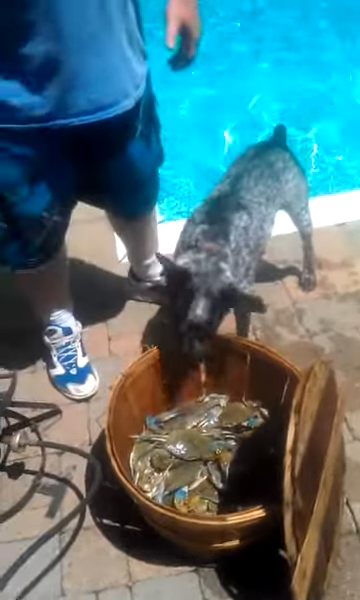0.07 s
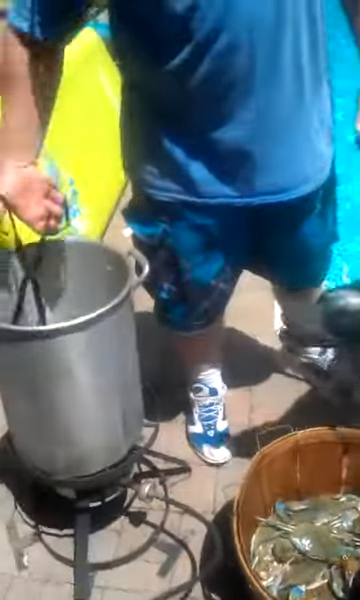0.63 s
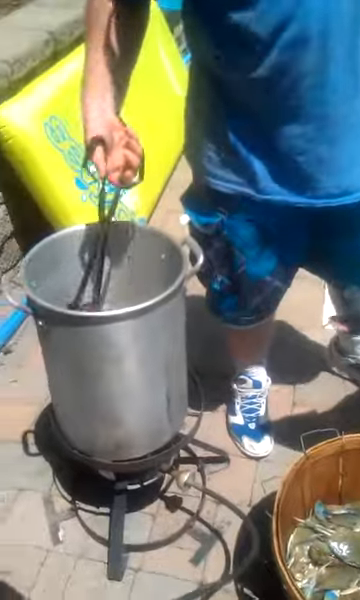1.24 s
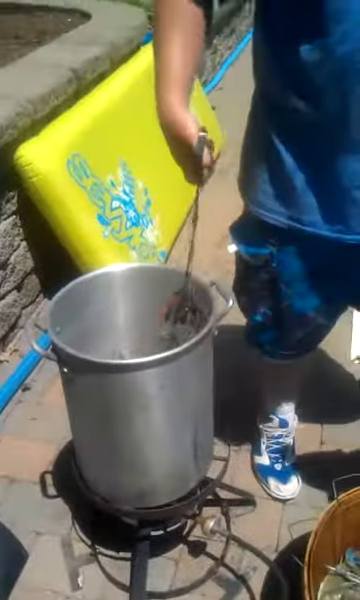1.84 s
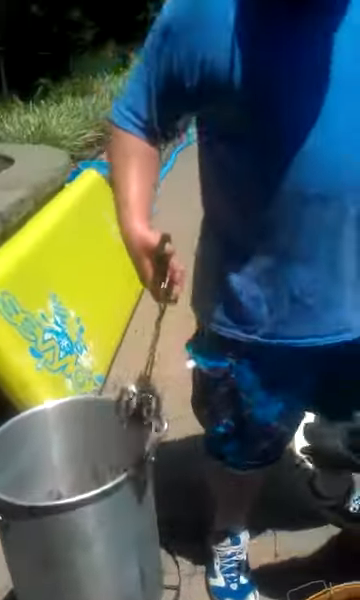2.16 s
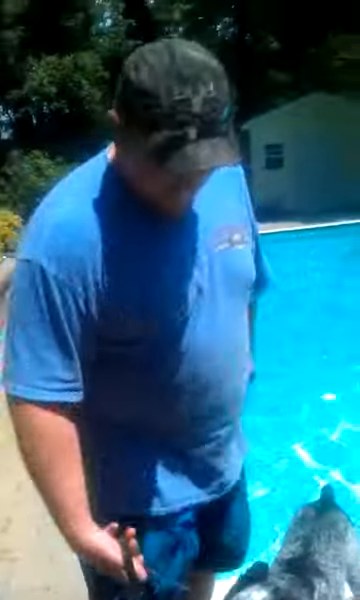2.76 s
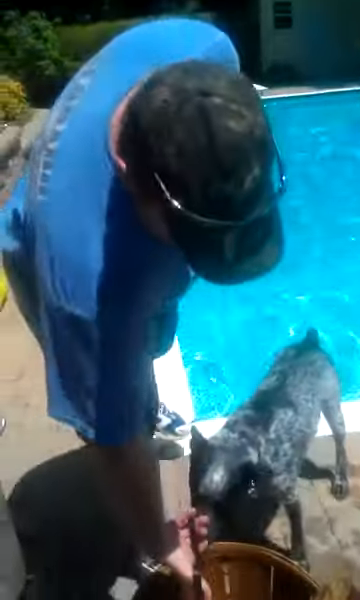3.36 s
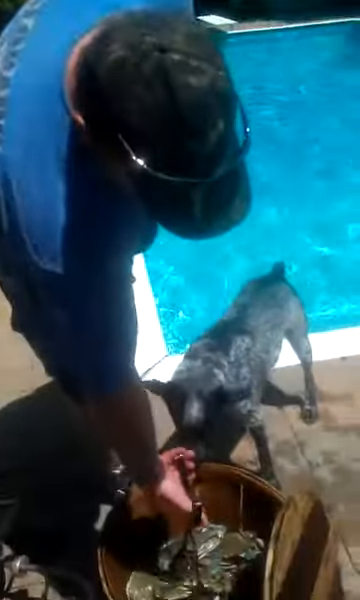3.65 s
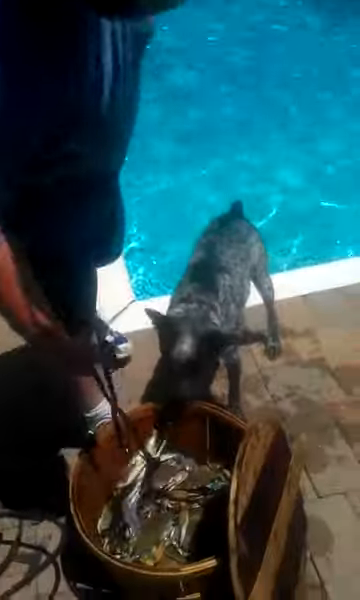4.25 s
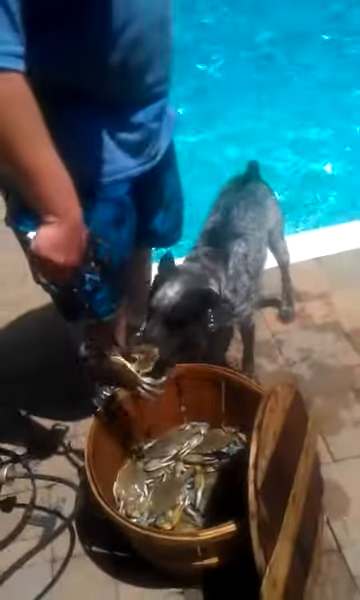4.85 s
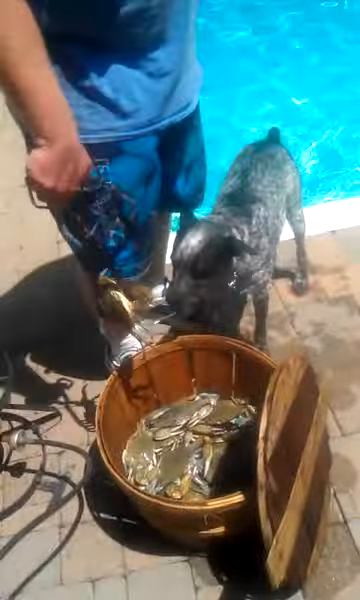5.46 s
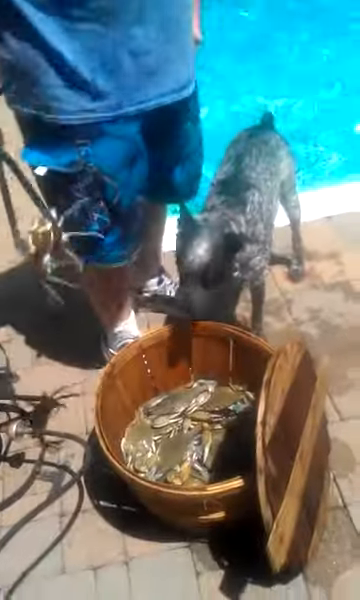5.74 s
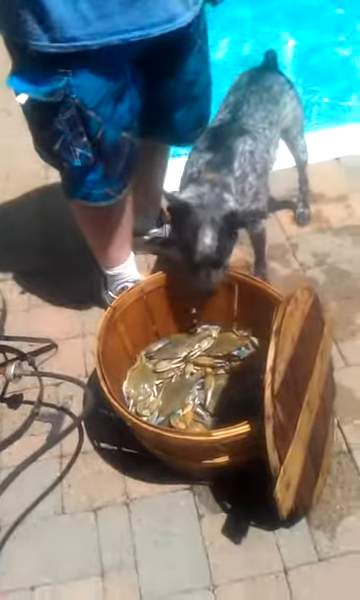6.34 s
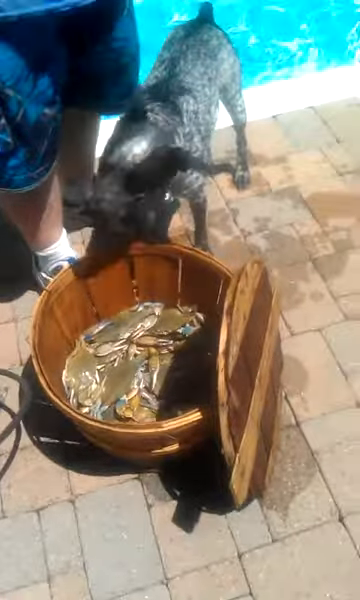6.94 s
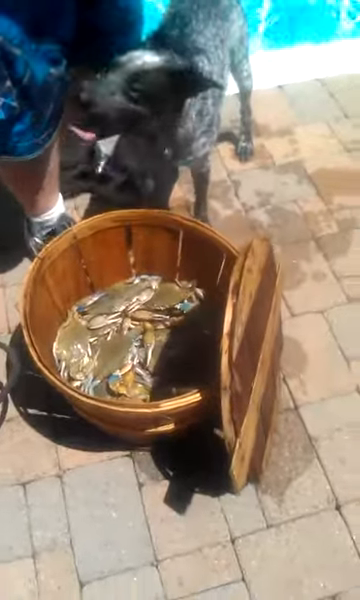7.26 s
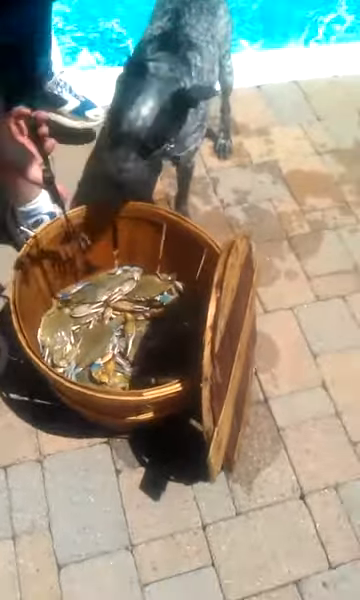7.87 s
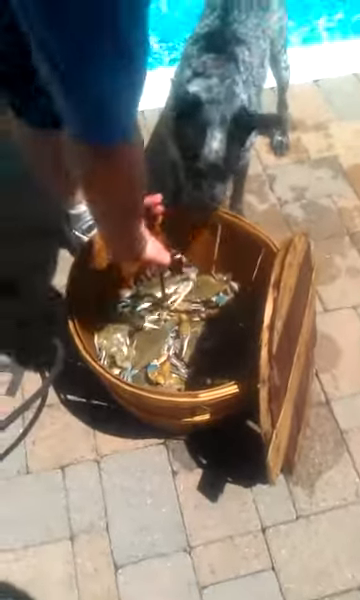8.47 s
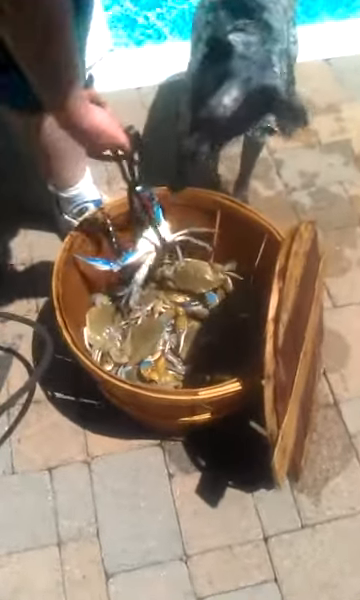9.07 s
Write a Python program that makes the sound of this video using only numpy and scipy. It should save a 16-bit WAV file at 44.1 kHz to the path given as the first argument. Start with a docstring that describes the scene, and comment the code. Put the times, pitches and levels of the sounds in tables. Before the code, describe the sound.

Steel tongs clack and knock around a wooden basket of live crabs, whose shells click and scrape over a soft outdoor rush.

```python
"""Live crabs are picked from a wooden basket with long steel tongs, over a patio's soft rush and pump hum. The
tongs clack shut and knock on pot and slats, their arms ringing; feet scuff between the flurries. Shells and
claws click and scrape together, then settle while a dog sniffs at the basket. Near 6.7 s steel squeaks on a
shell and the jaws snap shut. The heap rattles up again, ending in hard clacks. The patio gives every knock a
short slap back."""
import sys
import numpy as np
from scipy import signal
from scipy.fft import rfft, irfft, next_fast_len
from scipy.io import wavfile
from scipy.ndimage import uniform_filter1d, map_coordinates

SR = 44100
rng = np.random.default_rng(int(sys.argv[2]) if len(sys.argv) > 2 else 0)


def to_wav(s):
    """Save 16-bit WAV."""
    ch = np.atleast_2d(s).T  # columns
    pcm = np.round(np.clip(ch, -1, 1) * 32767)  # PCM
    wavfile.write(sys.argv[1], SR, pcm.astype(np.int16))


N = 406161

# Modes of the steel tongs. Each row: pitch in Hz, relative level in dB, t60 in seconds.
TONG_MODES = [(2548, 11, 0.051), (2683, 19.5, 0.018), (2976, 12, 0.051), (3630, -33, 0.2),
              (3970, -10, 0.065), (4800, -22, 0.019), (5360, 18, 0.027), (5660, 20, 0.03),
              (6090, 22, 0.024), (7130, 13, 0.024), (10100, 15, 0.036), (10800, -16, .05)]
# How busy the heap of crabs is. Each row: time in seconds, level in dB.
HEAP_ACTIVITY = [(0, -49.5), (.6, -59.5), (1.1, -58.5), (1.36, -53.5), (1.5, -60), (1.95, -51.5),
                 (2.5, -51.5), (3, -52.5), (4.3, -57.5), (5, -56.5), (5.6, -61.5), (6.5, -60), (7.1, -57.5),
                 (7.5, -60.5), (8.05, -58), (8.35, -52), (8.6, -60), (9.2, -50)]


def amp(db):
    """Decibels to gain."""
    return 10 ** (np.asarray(db) / 20)


def unit(x):
    """Scale to rms 1."""
    return x / np.sqrt(np.mean(x ** 2) + 1e-20)


def unit_attack(x):
    """Scale to rms 1 over the first 8 ms."""
    return x / np.sqrt(np.mean(x[:round(.008 * SR)] ** 2) + 1e-20)


def along(points, hz):
    """Read a curve of (Hz, value) points on a log frequency axis."""
    freqs, values = np.transpose(points)
    return np.interp(np.log(hz + 1), np.log(freqs + 1), values)


def wobble(rate):
    """A smooth random curve, rate knots a second."""
    return map_coordinates(rng.standard_normal(int(N * rate / SR) + 4), [np.arange(N) * rate / SR])


def swell(peak, rise, fall):
    """A bell-shaped envelope; all times in seconds."""
    t = np.arange(N) / SR - peak
    return np.exp(-(t / np.where(t < 0, rise, fall)) ** 2)


def grains(size, rate, spread_db):
    """Tiny slips at random moments, about rate a second, a few far stronger than the rest."""
    chance = rng.random(size)
    strength = np.minimum(rng.exponential(size=size), 4)
    return (chance < rate / SR) * amp(spread_db * strength) * np.sign(rng.standard_normal(size))


def filtered(x, response):
    """Shape x by a gain given as a function of Hz."""
    size = next_fast_len(len(x) + 4096)
    return irfft(rfft(x, size) * response(np.fft.rfftfreq(size, 1 / SR)), size)[:len(x)]


def coloured_noise(colour):
    """Noise at rms 1 whose spectrum follows (Hz, dB) points."""
    return unit(filtered(rng.standard_normal(N), lambda f: amp(along(colour, f))))


def band(x, low_hz, high_hz, order=3):
    """Causal band-pass."""
    return signal.sosfilt(signal.butter(order, [low_hz, high_hz], "band", fs=SR, output="sos"), x)


def resonance(f, hz, width):
    """Response at f of one resonance centred on hz."""
    return 1j * f * width / (hz * hz - f * f + 1j * f * width)


def resonant(x, peaks):
    """Play x through (Hz, width in Hz, dB) resonances of alternating polarity."""
    return filtered(x, lambda f: sum((-1) ** k * amp(db) * resonance(f, hz, width)
                                     for k, (hz, width, db) in enumerate(peaks)))


def add(track, start, sound):
    """Mix a sound in at start seconds."""
    part = track[max(round(start * SR), 0):][:len(sound)]
    part += sound[:len(part)]


def outdoors(drift_db=0.3, patchy_db=2.5, hum_hz=123.6, hum_db=-71):
    """A soft, patchy rush of air and pool water, with the low hum of a pump."""
    # Colour of the rush. Each row: frequency in Hz, relative level in dB.
    air_colour = [(20, -20), (60, -9.5), (95, -7), (130, 1), (260, -1), (420, -4), (900, -0.5),
                  (1550, -6.5), (2200, -1.5), (3100, -6.5), (3900, -12), (7000, -11), (9000, -18),
                  (13500, -18.5), (16000, -36)]
    # Peaks in that colour. Each row: centre in Hz, width in Hz, lift in dB.
    air_peaks = [(291, 11.6, 8.5), (814, 43, 4.5), (2240, 250, 4), (2770, 116, 5), (3414, 52, 11)]
    # Fader of the rush. Each row: time in seconds, level in dB.
    rush_levels = [(0, -52), (3, -51.5), (4.4, -53), (5.7, -53.5), (7.2, -52.5), (9.2, -53.5)]

    def colour(f):
        lift = sum(db / (1 + ((f - hz) / (width / 2)) ** 2) for hz, width, db in air_peaks)
        return amp(along(air_colour, f) + lift)

    t = np.arange(N) / SR
    spectra = signal.stft(rng.standard_normal(N), nperseg=512)[2]
    patches = uniform_filter1d(rng.standard_normal(spectra.shape), size=4, axis=0)
    patches = uniform_filter1d(patches, size=12, axis=1)
    lapping = signal.istft(spectra * amp(patchy_db * unit(patches)), nperseg=512)[1][:N]
    rush_db = np.interp(t, *np.transpose(rush_levels)) + drift_db * wobble(18)
    hum = amp(hum_db + 3.3 * wobble(3.1)) * unit(np.sin(2 * np.pi * hum_hz * t + .5 * wobble(3.1)))
    return amp(rush_db) * unit(filtered(lapping, colour)) + hum


def patio(x, tail_db=-15, slap_db=-19, slap_delay=0.018, slap_t60=0.027):
    """Adds a scattered slap from the low wall and a thin open-air tail."""
    # Decay of the tail. Each row: frequency in Hz, t60 in seconds.
    decay_times = [(200, 0.35), (1000, 0.24), (4000, 0.11), (12000, 0.036)]
    hz, t, spectra = signal.stft(rng.standard_normal(SR // 3), SR, nperseg=256)
    tail = signal.istft(spectra * amp(-60 * t / along(decay_times, hz)[:, None]), SR, nperseg=256)[1]
    late = np.arange(len(tail)) / SR - slap_delay
    slap = rng.standard_normal(len(tail)) * (late > 0) * amp(-60 * np.abs(late) / slap_t60)
    echo = amp(tail_db) * tail / np.linalg.norm(tail) + amp(slap_db) * slap / np.linalg.norm(slap)
    return x + signal.fftconvolve(x, echo)[:N]


def foot_scuffs(flutter_db=2):
    """Soles and clothes brush as someone shifts their stance: a soft body with an airy top."""
    # Each row: peak, rise and fall in seconds, level in dB, top in dB against the body.
    scuffs = [(.86, 0.086, 0.087, -45.5, -14.5), (2.42, 0.072, 0.063, -45, -3.5)]
    # Colours of the two layers. Each row: frequency in Hz, relative level in dB.
    body_colour = [(150, -22), (400, -2.5), (900, -3), (1500, -3.5), (2500, 8), (3300, -5.5), (5000, -17),
                   (9000, -36)]
    top_colour = [(2500, -30), (4500, -5), (7000, 6.5), (8500, -3), (10500, 5.5), (12500, -5), (15500, -21)]
    body, top = coloured_noise(body_colour), coloured_noise(top_colour)
    brush = sum(amp(db) * swell(peak, rise, fall) * (body + amp(top_db) * top)
                for peak, rise, fall, db, top_db in scuffs)
    return brush * amp(flutter_db * wobble(39.5))


def dog_sniffs(flutter_db=1):
    """The dog sniffs at the basket: soft swells of air through the hollows of its nose."""
    # Each row: peak, rise and fall in seconds, level in dB.
    sniffs = [(3.54, 0.13, .06, -51.5), (4.915, 0.14, 0.12, -48.5), (6.385, 0.15, 0.087, -44)]
    # Colour of the nose. Each row: frequency in Hz, relative level in dB.
    nose_colour = [(150, -22), (450, -8.5), (800, -1.5), (1200, 2.5), (1600, -10.5), (2250, 3.5),
                   (2700, -7.5), (4000, -22), (8500, -30), (11000, -19.5), (15000, -40)]
    breath = coloured_noise(nose_colour) * amp(flutter_db * wobble(30))
    return breath * sum(amp(db) * swell(peak, rise, fall) for peak, rise, fall, db in sniffs)


def basket(x):
    """Resonances of the slats, the hollow between them and the heaped shells."""
    # Each row: centre in Hz, width in Hz, gain in dB.
    basket_modes = [(253, 106, 0.5), (602, 175, 0.5), (980, 490, 3), (1805, 170, 6.5), (2040, 143, 7.5),
                    (2490, 535, 4.5), (3270, 1130, -1.5), (5780, 2800, -7.5), (7650, 610, -6.5),
                    (10700, 3700, -15.5)]
    return resonant(x, basket_modes)


def carapace(x, lift_db, q=22, count=7):
    """Every shell adds a few narrow resonances of its own."""
    centres_hz = 1800 * 8 ** rng.random(count)
    return filtered(x, lambda f: 1 + amp(lift_db) * sum(resonance(f, hz, hz / q) for hz in centres_hz))


def stirring(unrest_db=3, width_hz=110):
    """Restless legs keep scratching in the heap and the loose tongs jiggle in their lowest modes."""
    slips = grains(N, rate=900, spread_db=2.8) * amp(unrest_db * wobble(16))
    jiggle = filtered(slips, lambda f: sum(amp(db) * resonance(f, hz, width_hz)
                                           for hz, db, _ in TONG_MODES[:4]))
    scratch = band(basket(slips), 700, 5000, order=1)
    level_db = np.interp(np.arange(N) / SR, *np.transpose(HEAP_ACTIVITY))
    return amp(level_db) * unit(unit(scratch) + unit(jiggle))


def wall_bumps(trim_db=-5, attack_s=0.00044, width=0.098, t60_cycles=55):
    """Heavier blows sound clusters of low modes in basket and pot; the lower, the longer they last."""
    # Each row: start in seconds, level in dB before the trim, pitch in Hz.
    bumps = [(.093, -36, 510), (.147, -45, 553), (.286, -40, 1160), (.862, -39, 450), (1.677, -41, 554),
             (1.707, -37, 530), (2.243, -55, 900), (3.529, -39, 350), (3.762, -32.5, 626), (4.08, -31, 850),
             (6.712, -40.5, 308), (6.713, -42, 420), (6.715, -30.5, 970), (6.733, -37, 560),
             (8.27, -31, 1090), (8.49, -31.5, 1050), (8.648, -48, 267), (8.697, -26.5, 1070),
             (8.742, -43.5, 414), (8.752, -43, 271), (8.75, -26, 645), (8.862, -25, 970), (9.092, -44, 269),
             (9.155, -20, 1170)]
    out, t = np.zeros(N), np.arange(SR // 4) / SR
    for start, db, hz in bumps:
        wall = band(rng.standard_normal(len(t)), hz / (1 + width), hz * (1 + width), order=2)
        fade = amp(-60 * t * hz / t60_cycles) * (1 - np.exp(-t / attack_s))
        add(out, start, amp(db + trim_db) * unit(wall * fade) * np.sqrt(np.mean(fade ** 2)))
    return out


def shell_scrapes(catch_db=2.5, bottom_db=-13, roundness=0.61):
    """Spiny shells catch and slip; each drag rasps at its shell's pitch and sounds the hollow below."""
    # Drags over other crabs and along the slats. Each row: start and length in seconds, level in dB,
    # hollow and hiss in dB against the rasp, rasp and hollow pitches in Hz.
    drags = [(0.154, 0.055, -50, -2, -10, 2600, 1300), (1.575, 0.28, -48.5, -25, -6, 2700, 560),
             (2.055, 0.18, -54, -25, -1.5, 2930, 1400), (2.622, 0.081, -54, 8, -3, 2400, 960),
             (2.78, 0.085, -50.5, -10, -0.5, 3330, 556), (2.88, 0.18, -52.5, -14, -7, 2780, 960),
             (3.118, 0.099, -44.5, -9.5, -7.5, 3230, 875), (3.214, 0.065, -58.5, 8.5, -1, 1810, 860),
             (3.374, 0.1, -47.5, 0.5, -6, 2260, 785), (3.471, .15, -45.5, -10, -3.5, 1990, 710),
             (3.554, 0.058, -56, 0, 5, 2300, 710), (3.643, 0.042, -57.5, 4, 4.5, 2200, 870),
             (3.725, 0.12, -50.5, -6, -4.5, 2260, 660), (4.024, 0.089, -55, 9, 3.5, 1700, 880),
             (4.127, 0.086, -52, -1, 0.5, 2520, 910), (4.55, .05, -53, -4, -9, 2700, 900),
             (5.872, 0.055, -54.5, -19, -1, 3270, 1020), (6.569, 0.17, -50.5, -1, 0, 2600, 910),
             (6.726, 0.21, -54, -1.5, -2.5, 2870, 586), (7.704, 0.033, -45.5, -12, -6.5, 2420, 1400),
             (7.732, .06, -51, -20, -24, 1950, 1400), (7.914, 0.063, -42.5, -3, -5.5, 1840, 1350),
             (8.06, 0.13, -55, -6, 1, 3210, 750), (8.172, 0.11, -46, 2, -4, 2630, 935),
             (8.239, 0.029, -54, -5, 12.5, 2600, 1100), (8.261, 0.11, -56, 7, 0, 2700, 1140),
             (8.48, 0.078, -50.5, 3.5, -4, 2070, 1040), (8.627, 0.11, -56, 8, -4, 2500, 1050),
             (8.72, 0.18, -47, 4, -5.5, 2360, 1020), (8.886, 0.15, -58, 4, 0, 2100, 1110),
             (9.035, 0.047, -51, 11.5, -8, 2300, 990)]
    slips = grains(N, rate=3500, spread_db=1) * amp(catch_db * wobble(90))
    out = np.zeros(N)
    for start, length, db, hollow_db, hiss_db, rasp_hz, hollow_hz in drags:
        span = np.arange(max(round((start - .006) * SR), 0),
                         min(round((start + length + 0.0067) * SR), N))
        rub = carapace(slips[span], lift_db=2)
        rasp = unit(band(rub, rasp_hz / 1.33, rasp_hz * 1.33, order=2))
        hollow = unit(band(rub, hollow_hz / 1.22, hollow_hz * 1.22, order=2))
        hollow += amp(bottom_db) * unit(band(rub, 210, 490, order=2))  # the floor of the basket
        hiss = amp(hiss_db) * unit(band(basket(rub), 4400, 11200))
        crackle = grains(len(span), rate=600, spread_db=3.5)  # wet spines
        fizz = amp(-10 + 1.5 * hiss_db) * unit(band(crackle, 9400, 13200))
        stroke = np.abs(np.sin(np.linspace(0, np.pi, len(span)))) ** roundness
        out[span] += amp(db) * stroke * (rasp + amp(hollow_db) * hollow + hiss + fizz)
    return out


def stray_clicks(per_s=7, lift_db=10, spread_db=6, knock_db=-10.5, treble_db=-4.5, t60=0.053):
    """Rows for faint clicks of large and small shells at random moments, stronger in a busy heap."""
    rows = []
    for moment, strength, hardness, octave in rng.random((round(per_s * N / SR), 4)):
        start = moment * N / SR
        db = np.interp(start, *np.transpose(HEAP_ACTIVITY)) + lift_db + spread_db * (2 * strength - 1)
        hz = 1860 * 2 ** octave
        rows.append((start, db, knock_db, treble_db + spread_db * (2 * hardness - 1), t60, hz))
    return rows


def shell_clicks(trim_db=-11, crack_db=6, crack_t60=0.00022, knock_stretch=1.6, q=7):
    """A claw snaps on a shell: a hard crack and a dry rattle at that shell's pitch, inside the basket."""
    # The loudest clicks. Each row: start in seconds, level in dB before the trim,
    # knock and treble offsets in dB, rattle t60 in seconds, shell pitch in Hz.
    clicks = [(0.28, -35.5, -10, -25, 0.0096, 2090), (.474, -36, -14, -18, .03, 2000),
              (0.7379, -31, -11.5, -14.5, 0.051, 2700), (.943, -33.5, -13, -20, .03, 2450),
              (1.861, -36, -9, -13, 0.042, 2880), (2.546, -36, -30, -13, 0.038, 2180),
              (2.71, -37, -25, -2, 0.066, 2400), (2.837, -31, -18, -12, 0.082, 2590),
              (3.372, -40, -9, -8, 0.023, 2910), (3.412, -33, -4, -10, .02, 2640),
              (3.424, -38.5, 0, -10, 0.016, 2010), (3.446, -35, -9, -7, 0.032, 2130),
              (3.518, -40, -20, -12, 0.023, 3400), (3.756, -36.5, 0, -10, 0.052, 2460),
              (3.5715, -38.5, -2, 3, 0.06, 1860), (3.83, -36, -6, -5, 0.089, 2460),
              (3.997, -45.5, 6, 7, 0.025, 2490), (4.0732, -36.5, 0, 0, 0.08, 1570),
              (4.166, -45, -5, -1, 0.023, 1790), (4.648, -35, -24, -3.5, 0.025, 2420),
              (4.678, -44, 6.5, 4.5, 0.032, 1510), (5.012, -41, -12, -5, 0.045, 3300),
              (5.038, -47, -16, -5, .025, 3000), (6.219, -41.5, -7, -3.5, 0.033, 2170),
              (6.773, -35, -10, -5, 0.047, 2970), (6.7881, -34.5, -11, -2, 0.028, 4360),
              (7.575, -48, -14, 7.5, 0.022, 2910), (7.602, -32, -2, -16, 0.0096, 1770),
              (7.76, -38.5, -3, -22, 0.043, 1800), (8.091, -38.5, -6, -1.5, 0.013, 3200),
              (8.193, -32, 0.5, -2, 0.036, 2540), (8.211, -29, -8, -7, 0.033, 2650),
              (8.2357, -44, 6, 2, 0.032, 1500), (8.271, -37, -2, -4, 0.032, 2350),
              (8.312, -39.5, -10, 7, 0.064, 3200), (8.333, -36, 1.5, -13, 0.025, 2030),
              (8.418, -42.5, -9, -2, 0.01, 2750), (8.4588, -32.5, -21, -4.5, 0.0057, 2760),
              (8.544, -36.5, 0.5, -8.5, 0.042, 3200), (8.669, -41, 6, -18, .03, 2480),
              (8.703, -31, -8, -12, 0.045, 2520), (8.7315, -29.5, -9, -3.5, 0.038, 2520),
              (8.742, -30, -10, -3, 0.03, 2500), (8.751, -26, -1, -14, 0.024, 2490),
              (8.774, -29, -18, -22, 0.027, 2430), (8.807, -33, -10, 0, 0.042, 2190),
              (8.813, -30.5, -21, 4.5, 0.046, 4030), (8.8615, -31.5, 7, -5.5, 0.01, 2150),
              (8.873, -36, 3, -9, .03, 2640), (8.938, -41.5, 4, 3.5, .025, 3540),
              (8.98, -30.5, 0, -22, 0.017, 2130), (9.041, -31.5, -11, 1.5, 0.035, 2660)]
    # Knock, body, ring and tick ranges. Each row: low and high edge in Hz.
    ranges = [(480, 1350), (1900, 4200), (4600, 6900), (7000, 14200)]
    out, t = np.zeros(N), np.arange(SR // 6) / SR
    for start, db, knock_db, treble_db, t60, hz in list(clicks) + stray_clicks():
        rattle = grains(len(t), rate=6000, spread_db=4.5)
        snap = rattle * (amp(-60 * t / t60) + amp(crack_db - 60 * t / crack_t60))
        hit = basket(carapace(snap, lift_db=8.5))
        thud = basket(rattle * amp(-60 * t / (t60 * knock_stretch)))
        tone = band(resonant(snap, [(hz, hz / q, 0)]), hz / 2, 2 * hz, order=2)
        layers = zip([thud, hit, hit, hit], ranges, [knock_db + 2, -2, treble_db + 1, treble_db - 2])
        click = sum(amp(gain_db) * unit_attack(band(x, *edges)) for x, edges, gain_db in layers)
        add(out, start, amp(db + trim_db) * (click + unit_attack(tone)))
    return out


def pivot_rubs(flutter_db=2, grip_detune=0.018, rasp_db=-8):
    """The tong arms rasp at their pivot and sing faintly when carried, a little differently each grip."""
    # Each row: peak, rise and fall in seconds, level in dB, high modes in dB against the low.
    rubs = [(.185, 0.025, 0.022, -52, -3), (1.37, 0.061, 0.04, -47.5, -16), (4.585, 0.028, 0.017, -52, -10),
            (5.09, 0.017, 0.027, -54, -10), (5.905, 0.024, 0.03, -55, 2), (6.141, 0.046, .02, -52.5, -11),
            (7, 0.043, 0.026, -54, -7), (7.17, 0.11, 0.16, -57, -18), (7.385, 0.038, 0.049, -49.5, 1),
            (7.5, 0.042, .06, -53, -5.5)]
    # Modes that the pivot excites. Each row: centre in Hz, width in Hz, relative level in dB.
    low_modes = [(2675, 56, 2), (2990, 110, 1.5), (3440, 50, -1.5)]
    high_modes = [(4700, 200, -2), (5340, 150, 9), (6400, 220, -12)]
    out, size = np.zeros(N), round(.6 * SR)
    for peak, rise, fall, db, high_db in rubs:
        friction = grains(size, rate=3000, spread_db=2.5) * amp(flutter_db * wobble(24.2)[:size])
        tuning = [1 + grip_detune * rng.uniform(-1.55, 1), 1, 1]  # moves the centres only
        registers = [(band(friction, 1200, 3300), low_modes), (band(friction, 3800, 7000), high_modes)]
        low, high = (unit(amp(rasp_db) * unit(rasp) + unit(resonant(rasp, np.multiply(modes, tuning))))
                     for rasp, modes in registers)
        singing = np.zeros(N)
        add(singing, peak - size / SR / 2, low + amp(high_db) * high)
        out += amp(db) * swell(peak, rise, fall) * singing
    return out


def jaw_squeak(start=6.636, length=0.075, hz=5930, db=-41, waver=0.0035):
    """Steel slides on a shell and sings briefly just before the jaws shut."""
    out, size = np.zeros(N), round(length * SR)
    cycles = np.cumsum(hz * (1 + waver * wobble(120)[:size])) / SR
    add(out, start, amp(db) * np.sin(2 * np.pi * cycles) * np.sin(np.linspace(0, np.pi, size)))
    return out


def arm_rings(beat_hz=9, attack_s=0.00088):
    """Where the jaws spring apart, one arm rings on freely as a slowly beating pair of tones."""
    # Each row: start in seconds, level in dB, pitch in Hz, t60 in seconds.
    rings = [(.093, -36, 5370, 0.17), (0.092, -29.5, 2961, 0.14), (1.662, -33, 2700, .1),
             (1.707, -40, 2690, 0.22), (9.155, -14.5, 2144, .06)]
    out, t = np.zeros(N), np.arange(SR // 2) / SR
    for start, db, hz, t60 in rings:
        pair = np.sin(2 * np.pi * hz * t) + .5 * np.sin(2 * np.pi * ((hz + beat_hz) * t + rng.random()))
        add(out, start, amp(db - 60 * t / t60) * pair * (1 - np.exp(-t / attack_s)))
    return out


def arm_bending(t, detune=0.013, scatter_db=3):
    """A blow flexes the long arms, which sound their low bending modes."""
    # Each row: pitch in Hz, relative level in dB, t60 in seconds.
    bending_modes = [(953, 2, 0.074), (1276, -4, 0.038), (1438, -0.5, 0.058), (1710, 1, 0.056),
                     (1803, -3, .05), (2020, -3, 0.074)]
    out = np.zeros(len(t))
    for hz, db, t60 in bending_modes:
        fade = amp(db + scatter_db * rng.standard_normal() - 60 * t / t60)
        out += fade * np.sin(2 * np.pi * (hz * (1 + detune * rng.standard_normal()) * t + rng.random()))
    return out


def steel_modes(t, detune=0.016, scatter_db=2):
    """Struck steel rings in close pairs of modes, each shifted by the grip and the load."""
    hz, db, t60 = np.transpose(np.repeat(TONG_MODES, 2, axis=0))[:, :, None]
    fades = amp(db + scatter_db * rng.standard_normal(hz.shape) - 60 * t / t60)
    gripped_hz = hz * (1 + detune * rng.standard_normal(hz.shape))
    return np.sum(fades * np.sin(2 * np.pi * (gripped_hz * t + rng.random(hz.shape))), 0)


def tong_clacks(trim_db=-8, steel_db=-3, arm_db=-8, arm_t60=0.037, linger_db=-36, linger_t60=0.35,
                contact_s=0.0059, attack_s=0.00039, crack_db=4, crack_t60=0.004, knock_stretch=1.23):
    """The jaws chatter as they meet, knocking the basket and ringing the steel and two arm modes."""
    # Each row: start in seconds, level in dB before the trim, knock, ring and tick offsets in dB,
    # chatter t60 in seconds, low and high grip-tuned arm modes in Hz.
    clacks = [(0.035, -36.5, -18, 5, -1.5, .035, 2900, 5530), (.091, -17.5, -8, -9, -11, 0.046, 2630, 5404),
              (.116, -32, -8, -3, -12, 0.068, 2930, 5500), (0.2756, -46, -10, -19, 10, 0.018, 2200, 5400),
              (0.3607, -25, -6, -12, -18, 0.035, 2470, 4730),
              (0.3928, -17.5, -10, -14.5, -22, 0.02, 2140, 6300),
              (0.426, -35, -18, -11, -28, 0.028, 2470, 4635),
              (0.435, -29, -18, -15, -30, 0.036, 2390, 4680),
              (1.656, -22.5, -10.5, -4, -16, 0.026, 2690, 6540),
              (1.662, -19.5, -16, -23, -24, 0.022, 2640, 6400),
              (1.6756, -20, -12, -12, -15, 0.05, 2680, 6395),
              (1.686, -24.5, -15, -17, -17, .07, 2680, 6400),
              (1.7052, -19, -13, -12, -17.5, 0.047, 2230, 5927),
              (1.7137, -26.5, -14, -8, -14, 0.11, 2360, 6000),
              (1.7777, -25.5, -23, -12, -20, 0.091, 2610, 5313),
              (1.9292, -24.5, -21, -23, -13.5, 0.035, 2340, 4660),
              (1.968, -31.5, -33, -9, -12, 0.21, 2700, 4950), (2.1781, -34, -32, -7, -24, 0.13, 2880, 5400),
              (2.769, -30, -28, -10, -14, 0.025, 2520, 6163),
              (2.968, -30, -26, -17, -18, 0.067, 2850, 4721), (3.973, -42, -22, 2.5, -2, .06, 2560, 5170),
              (6.612, -33, -18, -6, -15, 0.15, 2100, 6917), (6.652, -33, -9, -1, -13, 0.073, 2723, 5950),
              (6.7095, -14.5, -10.5, 6, -10, 0.051, 2915, 5500),
              (6.731, -32, -2, -1, -4, 0.045, 2880, 5450), (8.7828, -26.5, -13, -5, 4.5, 0.059, 2220, 7400),
              (9.102, -33, -22, 5.5, 6.5, .024, 3370, 5460), (9.137, -20, -5.5, -13, -25, .06, 2250, 4753),
              (9.1537, -15, -11.5, -26, -25, 0.058, 2170, 4630)]
    # Knock, clack, ring and tick ranges. Each row: low and high edge in Hz.
    ranges = [(400, 1650), (1750, 4400), (4300, 6800), (6800, 13200)]
    knock_range, clack_range, ring_range, tick_range = ranges
    out, t = np.zeros(N), np.arange(SR // 4) / SR
    since_contact = np.maximum(t - contact_s, 0)
    onset = 1 - np.exp(-t / attack_s)
    arm_fade = amp(-60 * t / arm_t60) + amp(linger_db - 60 * t / linger_t60)  # sings on faintly
    for start, db, knock_db, ring_db, tick_db, t60, low_hz, high_hz in clacks:
        steel = unit_attack(steel_modes(t))
        arms = unit_attack((np.sin(2 * np.pi * low_hz * t) + np.sin(2 * np.pi * high_hz * t)) * arm_fade)
        bend = amp(knock_db + 1) * unit_attack(onset * arm_bending(t))
        chatter = grains(len(t), rate=9000, spread_db=3)
        snap = chatter * (amp(-60 * since_contact / t60) + amp(crack_db - 60 * t / crack_t60))
        hit = onset * (unit_attack(snap) + amp(steel_db) * steel + amp(arm_db) * arms)
        thud = basket(onset * chatter * amp(-60 * since_contact / (t60 * knock_stretch)))
        layers = [(thud, knock_range, knock_db + 0.5),
                  (hit, (0.8 * low_hz, clack_range[1]), 0),  # little clack below the low arm mode
                  (hit, ring_range, ring_db),
                  (hit, tick_range, tick_db)]
        clack = sum(amp(gain_db) * unit_attack(band(x, *edges, order=4)) for x, edges, gain_db in layers)
        add(out, start, amp(db + trim_db) * (clack + bend))
    return out


def scene():
    """Tongs, crabs, dog and feet on the patio, over the outdoor bed, in mono."""
    tongs = tong_clacks() + arm_rings() + jaw_squeak() + pivot_rubs()
    crabs = shell_clicks() + shell_scrapes() + wall_bumps() + stirring()
    return (patio(tongs + crabs + dog_sniffs() + foot_scuffs()) + outdoors())[None]


def record(dry, low_cut_hz=95, top_hz=16000):
    """A small microphone with little bass and a steep band limit."""
    thin = signal.sosfilt(signal.butter(2, low_cut_hz, "high", fs=SR, output="sos"), dry[0])
    return filtered(thin, lambda hz: hz < top_hz)[None]


dry = scene()
out = record(dry)
to_wav(out)
```